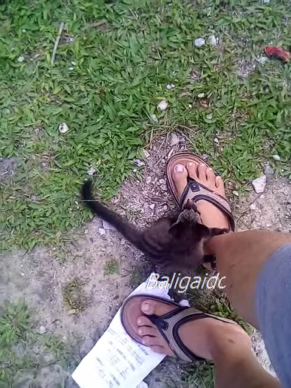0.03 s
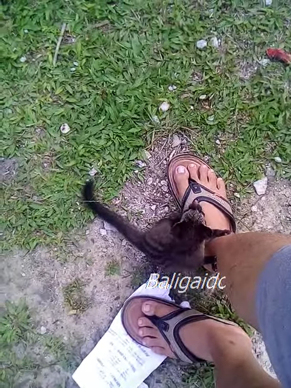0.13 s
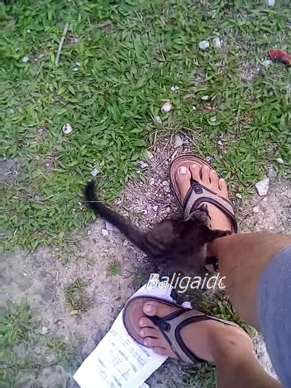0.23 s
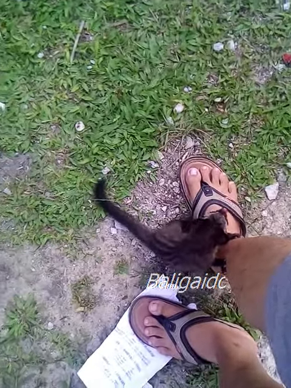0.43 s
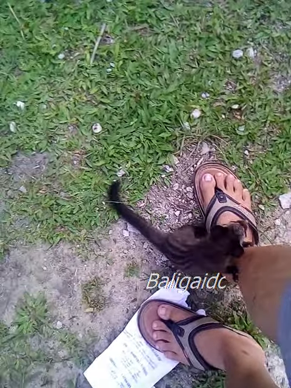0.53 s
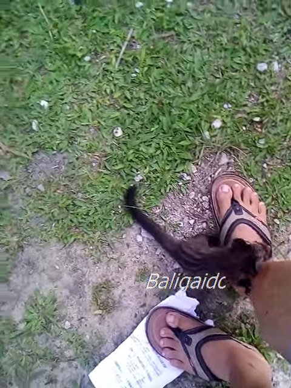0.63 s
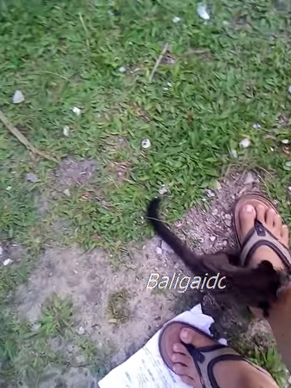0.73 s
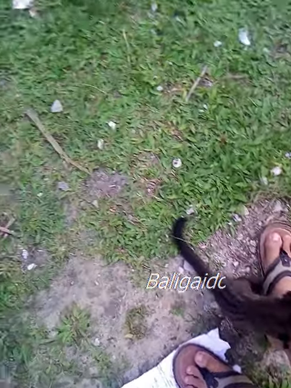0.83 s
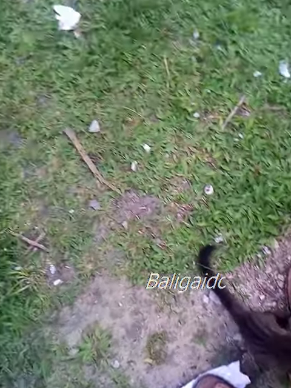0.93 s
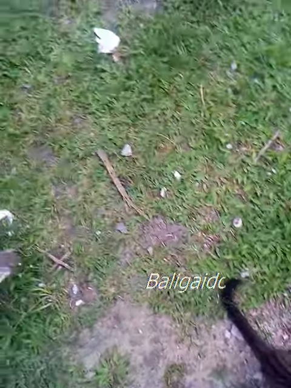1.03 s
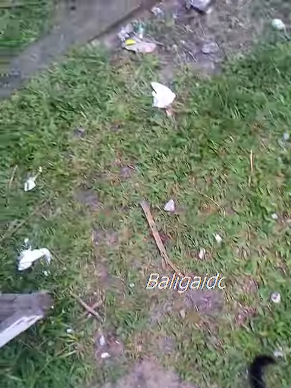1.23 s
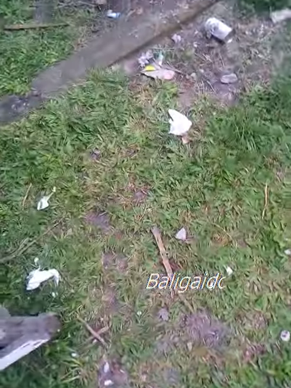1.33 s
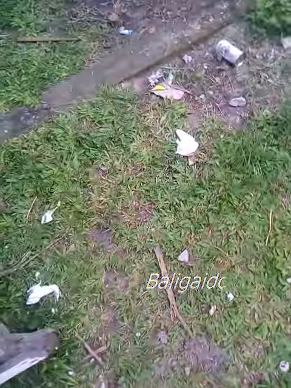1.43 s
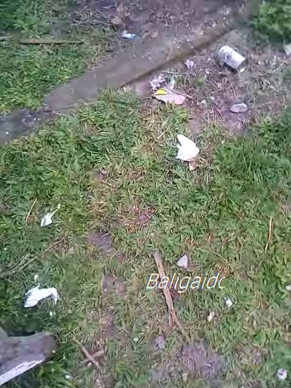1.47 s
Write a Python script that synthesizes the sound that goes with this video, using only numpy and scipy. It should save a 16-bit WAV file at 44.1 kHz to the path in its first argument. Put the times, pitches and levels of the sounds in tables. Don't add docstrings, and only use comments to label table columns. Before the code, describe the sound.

A small animal's rough, buzzy chatter leaps into quick squeaks, crossed by a clear wavering whine.

```python
import sys
import numpy as np
from scipy import signal
from scipy.fft import rfft, irfft
from scipy.io import wavfile
from scipy.ndimage import uniform_filter1d

SR = 44100
rng = np.random.default_rng(int(sys.argv[2]) if len(sys.argv) > 2 else 0)


def wav_out(sig):
    wavfile.write(sys.argv[1], SR, np.round(np.clip(np.atleast_2d(sig).T, -1, 1) * 32767).astype(np.int16))


def decibels_to_gain(level_db):
    exponent = np.asarray(level_db, float) / 20
    return 10 ** exponent


N = 154350


def chatter():
    # start_s, end_s, resting_pitch_hz, level_db, level_slope_db_per_s
    bouts = [
        (-.1, 0.251, 394.4, -42, -9.5),
        (0.819, 1.157, 350.6, -42, 4.5),
        (1.852, 2.404, 397.5, -46.5, -2.5),
        (2.833, 3.6, 416.8, -46, 0.2),
    ]
    # start_db, slope_db_per_s
    bout_top = [(-0.5, -5), (-2.5, -5.5), (4, -25), (-2, -11.5)]
    # top_s, top_pitch_hz, rise_s, fall_s, swell_db
    leaps = [(.001, 1573, 0.072, .02, 9), (0.14, 1782, .031, .021, 7.5), (0.843, 2016, 0.013, .013, 6.5),
             (0.954, 1710, .014, 0.012, 10), (1.121, 1843, .045, .016, 6), (1.879, 2182, .014, .012, 5.5),
             (1.983, 1890, .022, .017, 7.5), (2.110, 1918, .03, .022, 6.5),
             (2.329, 2201, 0.033, 0.021, 11.5), (2.864, 2300, 0.0091, 0.015, 8),
             (2.974, 1908, .024, .016, 7), (3.004, 1289, .025, .03, 5), (3.09, 1161, 0.049, 0.034, 5.5),
             (3.116, 1986, 0.028, .025, 9.5), (3.188, 524.6, .03, 0.055, 2.5),
             (3.28, 2160, 0.042, 0.024, 8), (3.46, 2252, 0.034, 0.038, 9)]
    # time_s, top_gain_db, gain_above_lowest_strong_band_db
    opening = [(0, 1.5, 0), (.09, -2, 2), (.17, 7, 1.5), (.25, -9.5, 4.5), (.83, 3, -3.5), (.9, 1, -4),
               (1.1, -4, -1.5), (1.86, -2.5, -1), (1.94, -4, 1), (2.02, 1, 3), (2.16, 3.5, 4),
               (2.27, -5, -10), (2.35, 4, -2), (2.41, -7, -3), (2.85, 8, -7), (2.93, 3.5, 0),
               (3.05, 0.5, -2), (3.22, -1, 0), (3.32, 8, -1.5), (3.4, -8, -0.5), (3.49, 9, 1.5)]
    # centre_hz, width_hz, depth_0_to_1
    gaps_chatter = [(3350, 600, .8), (4400, 500, .45), (11450, 2200, .97)]
    # centre_hz, width_hz, level_db
    mouth_early = [(2400, 500, -19), (3800, 250, -10), (4480, 400, -20), (4970, 420, -21.5),
                   (6000, 1100, 3.5), (6930, 330, 2), (8450, 530, -4.5), (8120, 660, -15.5),
                   (9200, 880, -16), (10540, 230, -19.5), (12400, 500, -40), (13200, 500, -41),
                   (14500, 900, -43.5)]
    # centre_hz, width_hz, level_db
    mouth_late = [(2300, 123, -11), (2647, 350, -12), (4000, 200, -9.5), (5215, 694, 3.5), (5766, 930, 1.5),
                  (6680, 300, 3.5), (7860, 650, 2.5), (8590, 320, -8.5), (9610, 330, -22.5),
                  (11430, 440, -34), (12300, 300, -40), (12900, 420, -26), (14650, 900, -38)]

    t = np.arange(N) / SR
    early = t < 1.5
    rest_hz, level, bout_top_db = np.full(N, 400.), np.zeros(N), np.zeros(N)
    for (start, end, hz, db, slope_db), (top_db, top_slope_db) in zip(bouts, bout_top):
        current = t > start - .05
        rest_hz[current] = hz
        bout_top_db[current] = (top_db + top_slope_db * (t - start))[current]
        level += gate(start, end) * decibels_to_gain(db + slope_db * (t - start))

    flatness, swell_wider = 2.5, 1.695
    skirt_share, skirt_wider = .22, 1.9
    lift, swell_db = 0, 0
    for s, top_hz, rise, fall, db in leaps:
        away = np.abs(t - s) / np.where(t < s, rise, fall)
        peak = np.exp(-away ** flatness)
        skirt = np.exp(-(away / skirt_wider) ** 2)
        dome = (1 - skirt_share) * peak + skirt_share * skirt
        lift = lift + (np.maximum(top_hz - rest_hz, 0) * dome) ** 4
        swell_db = np.maximum(swell_db, db * np.exp(-(away / swell_wider) ** 2))

    pitch_hz = rest_hz + lift ** .25
    slack = (rest_hz / pitch_hz) ** 2
    shaky_hz = pitch_hz * (1 + .013 * slack * drift(120))
    breath = np.where(early, .12, .2) * slack + .07
    shimmer_db = 1.5 * drift(79)
    source = level * decibels_to_gain(swell_db + shimmer_db) * voice(shaky_hz, breath, count=50)

    linger_s = 0.039
    effort_db = uniform_filter1d(swell_db, int(linger_s * SR))
    source = brighten(source, 6800, -11.5 + 1.55 * effort_db + bout_top_db)
    open_db, round_db = in_time(opening, 0.025)
    source = brighten(source, 7500, open_db)
    source = brighten(source, 5505, round_db)
    source = cancel(source, gaps_chatter)
    return mouth(source * early, mouth_early) + mouth(source * ~early, mouth_late)


def whine():
    # time_s, pitch_hz, level_db, brightness_db
    short_call = [
        (0.664, 1720, -46, -40),
        (0.674, 1617, -42, -40),
        (0.682, 2252, -48.5, -32),
        (0.69, 3626, -36.5, -27),
        (0.701, 4070, -40, -23),
        (0.711, 3536, -40.5, -5.5),
        (0.724, 2380, -40.5, 0.5),
        (0.756, 1380, -42.5, -8),
        (0.776, 1541, -43.5, -14),
    ]
    long_start = [
        (0.952, 2469, -31, -2),
        (0.96, 2818, -32, 1),
        (0.969, 3078, -34, 0.5),
        (0.977, 2830, -37, 3),
        (0.995, 1967, -46.5, 11.5),
        (1.032, 1555, -43.5, 4.5),
        (1.044, 1622, -47.5, 8.5),
        (1.065, 1997, -49.5, 11),
        (1.075, 2062, -39, -7),
    ]
    long_middle = [
        (1.075, 2150, -38, -4),
        (1.106, 2232, -37.5, 3),
        (1.115, 1983, -44, 6),
        (1.131, 1550, -48, 14),
        (1.153, 1299, -50, 9),
        (1.162, 1124, -40, -3.5),
        (1.188, 1102, -42.5, -3.5),
        (1.194, 1122, -40, -1),
    ]
    long_end = [
        (1.194, 1110, -40, -9),
        (1.211, 1428, -49, 10),
        (1.235, 2260, -34.5, -4),
        (1.258, 2778, -37, 3),
        (1.269, 2260, -35, -4.5),
        (1.296, 1807, -43, 2.5),
        (1.318, 1230, -43, -2),
        (1.339, 1042, -51, -2),
        (1.352, 1145, -40.5, -13),
        (1.369, 1252, -41.5, -46),
    ]
    # centre_hz, width_hz, level_db
    mouth_chirp = [(2280, 680, -5.5), (2930, 400, -3), (4090, 850, 3.5), (4940, 650, 6.5), (6620, 590, 2.5),
                   (9700, 240, -16), (11000, 350, -20), (12300, 470, -18.5), (13040, 500, -32)]
    # centre_hz, width_hz, level_db
    mouth_wide = [(2184, 620, -5), (2900, 250, -9.5), (4230, 400, -12), (4730, 690, 2), (5770, 590, 4.5),
                  (7000, 1200, -6.5), (7600, 1400, -35.5), (9200, 600, -22), (10600, 710, -43),
                  (12500, 1200, -43)]
    # centre_hz, width_hz, level_db
    mouth_whine = [(2224, 280, -4.5), (2830, 250, -12.5), (3680, 480, 4), (4470, 690, 6.5),
                   (5600, 380, 6.5), (6470, 1150, 1), (7730, 280, -9), (8830, 500, -21), (9900, 400, -20.5),
                   (11000, 600, -18.5), (12300, 600, -28), (13500, 700, -38), (15000, 600, -31)]
    # centre_hz, width_hz, depth_0_to_1
    gaps_chirp = [(5900, 700, .8), (8500, 1500, .9), (13800, 1500, .8)]
    gaps_wide = [(3500, 1100, .9), (12500, 7000, .85)]
    gaps_whine = [(3150, 300, .6), (9500, 600, .7), (12900, 1200, .8), (14300, 600, .6)]

    t = np.arange(N) / SR
    path = short_call + long_start + long_middle[1:] + long_end[1:]
    pitch_hz, level_db, top_db = in_time(path, 0.0083)
    on = gate(short_call[0][0], short_call[-1][0]) + gate(long_start[0][0], long_end[-1][0])
    shaky_hz = pitch_hz * (1 + .003 * drift(150))
    shimmer_db = 1.6 * drift(75)
    tone = on * decibels_to_gain(level_db + shimmer_db) * voice(shaky_hz, .03, count=17)

    breath = on * decibels_to_gain(level_db - 7) * rng.standard_normal(N)
    tone = tone + signal.sosfilt(signal.butter(4, 8500, "high", fs=SR, output="sos"), breath)
    tone = brighten(tone, 4400, top_db, order=6)

    long_call = t > .9
    wide = np.clip((1.15 - t) / .03, 0, 1) * long_call
    chirp_part = mouth(cancel(tone * (t < .9), gaps_chirp), mouth_chirp)
    wide_part = mouth(cancel(tone * wide, gaps_wide), mouth_wide)
    whine_part = mouth(cancel(tone * (1 - wide) * long_call, gaps_whine), mouth_whine)

    after = t - 1.369
    smack = decibels_to_gain(-40 - 60 * np.maximum(after, 0) / 0.016) * (after > 0) * rng.standard_normal(N)
    smack = signal.sosfilt(signal.butter(4, [1900, 5600], "band", fs=SR, output="sos"), smack)
    return wide_part + whine_part + chirp_part + smack


def echoes(x):
    slap_s, t60_s, level_db, cut_hz = 0.037, 0.27, -12.5, 11100
    t = np.arange(SR // 4) / SR
    scatter = np.where(t < slap_s, 1, .4) * decibels_to_gain(-60 * t / t60_s) * (t > .002)
    scatter = scatter * rng.standard_normal(len(t))
    scatter = scatter / np.sqrt(np.sum(scatter ** 2))
    slap = 0.043 * (np.arange(len(t)) == int(slap_s * SR))
    wet = signal.fftconvolve(x, scatter + slap)[:N]
    return decibels_to_gain(level_db) * signal.sosfilt(signal.butter(4, cut_hz, fs=SR, output="sos"), wet)


def background():
    # time_s, firing_rate_hz, level_db
    firing = [(0, 23.26, -49), (.5, 23.12, -50), (1.2, 22.61, -52), (1.9, 22.91, -44), (2.7, 22.53, -49),
              (3.5, 23.18, -46.5)]
    # multiple, level_db
    orders_db = [(1, -10.5), (2, -20), (3, 1), (4, -3), (5, 3.1), (6, -0.5), (7, -25), (8, -23.5)]
    # centre_s, multiple, length_s, boost_db
    booms = [
        (0.201, 5, .2, 5),
        (2.001, 3, .12, 4),
        (2.549, 3, .2, 4.5),
        (2.882, 3, .1, 5.5),
        (3.074, 6, .1, 10),
    ]
    # frequency_hz, density_db_per_hz
    air_colour = [(170, -5), (200, -6.5), (300, -13), (1680, -19), (2780, -29.5), (5810, -38), (7300, -44),
                  (8200, -50.5), (15600, -49.5)]
    # time_s, level_db
    air_level = [(0.0, -58), (1.5, -61.5), (1.93, -61), (2.14, -63.5), (3.5, -60.5)]

    t = np.arange(N) / SR
    firing_hz, engine_db = in_time(firing)
    turn = 2 * np.pi * np.cumsum(firing_hz * (1 + 0.0078 * drift(2.8))) / SR
    orders = 0
    for k, order_db in orders_db:
        boom_db = sum(db * np.exp(-((t - s) / span) ** 2) for s, m, span, db in booms if m == k)
        level = decibels_to_gain(order_db + boom_db + 3 * drift(3.9))
        phase = k * turn + rng.uniform(0, 2 * np.pi) + 1.36 * drift(5.54)
        orders = orders + level * np.sin(phase)
    engine = decibels_to_gain(engine_db) * rms_one(orders)

    rumble_band = signal.butter(2, (47, 166), "band", fs=SR, output="sos")
    rumble = signal.sosfilt(rumble_band, rng.standard_normal(N + SR))[SR:]
    rumble = decibels_to_gain(-57 + 2.0 * drift(7.6)) * rms_one(rumble)

    f = np.arange(N // 2 + 1) * SR / N + 1
    air_hz, density_db = np.transpose(air_colour)
    colour = decibels_to_gain(np.interp(np.log(f), np.log(air_hz), density_db)) * (f > air_hz[0]) * (f < air_hz[-1])
    air = rms_one(irfft(rfft(rng.standard_normal(N)) * colour, N))
    air = air * (1 + 0.068 * np.cos(turn))
    air = decibels_to_gain(in_time(air_level)[0] + 1.1 * drift(6.7)) * air
    return engine + rumble + air


def voice(hz, breath, count):
    phase = 2 * np.pi * np.cumsum(hz) / SR
    k = np.arange(1, count + 1)[:, None]
    below_top = np.clip((17000 - k * hz) / 1000, 0, 1)
    pulses = (np.cos(k * phase) * below_top).sum(axis=0) * np.sqrt(4 * hz / SR)
    breath = np.clip(breath, 0, 1)
    puffs = (1 + np.cos(phase)) * rng.standard_normal(N)
    return np.sqrt(1 - breath) * pulses + np.sqrt(breath * 2 / 3) * puffs


def mouth(x, peaks):
    click = (np.arange(1024) == 0) + 1e-18
    ring = 0
    for hz, width_hz, db in peaks:
        r = np.exp(-np.pi * width_hz / SR)
        peak = [(1 - r * r) / 2, 0, (r * r - 1) / 2, 1, -2 * r * np.cos(2 * np.pi * hz / SR), r * r]
        ring = ring + decibels_to_gain(db) * signal.sosfilt([peak, peak], click)
    ring = signal.sosfilt(signal.butter(6, [1950, 15000], "band", fs=SR, output="sos"), ring)
    return signal.fftconvolve(x, ring / np.sqrt(np.sum(ring ** 2)))[:N]


def cancel(x, gaps):
    for hz, width_hz, depth in gaps:
        x = x - depth * signal.lfilter(*signal.iirpeak(hz, hz / width_hz, fs=SR), x)
    return x


def brighten(x, edge_hz, top_db, order=3):
    low = signal.sosfiltfilt(signal.butter(order, edge_hz, fs=SR, output="sos"), x)
    return low + decibels_to_gain(top_db) * (x - low)


def gate(start, end):
    attack_s, release_s = 0.018, 0.0029
    t = np.arange(N) / SR
    return np.clip((t - start) / attack_s, 0, 1) * np.clip((end - t) / release_s + 1, 0, 1)


def in_time(rows, smooth_s=.006):
    s, *cols = np.transpose(rows)
    curves = [np.interp(np.arange(N) / SR, s, c) for c in cols]
    return [uniform_filter1d(c, int(smooth_s * SR), mode="nearest") for c in curves]


def drift(hz):
    r = np.exp(-2 * np.pi * hz / SR)
    return rms_one(signal.lfilter([1], [1, -2 * r, r * r], rng.standard_normal(N + SR))[SR:])


def rms_one(x):
    return x / np.sqrt(np.mean(x ** 2) + 1e-20)


def scene():
    calls = chatter() + whine()
    return np.tile(calls + echoes(calls) + background(), (2, 1))


def band_limit(x):
    return signal.sosfilt(signal.butter(12, 15500, fs=SR, output="sos"), x)


def record(dry):
    return band_limit(dry)


dry = scene()
out = record(dry)
wav_out(out)
```